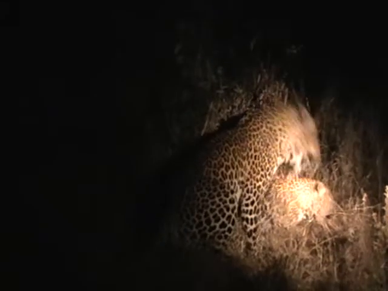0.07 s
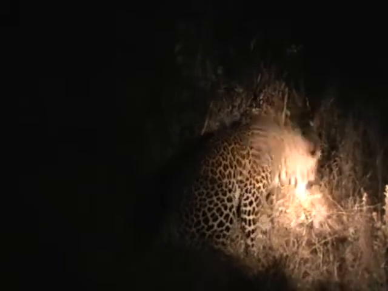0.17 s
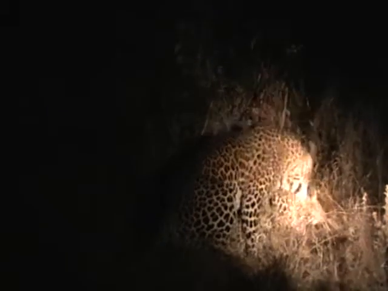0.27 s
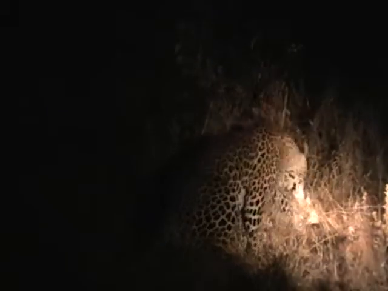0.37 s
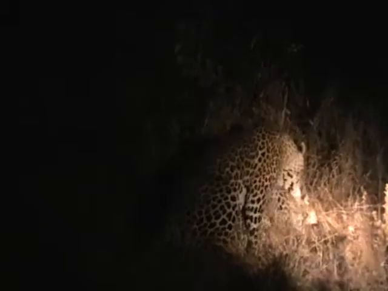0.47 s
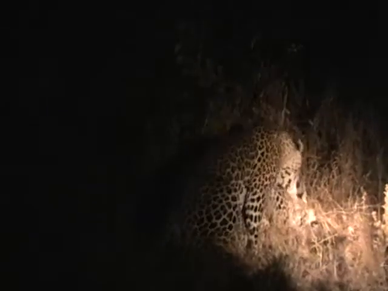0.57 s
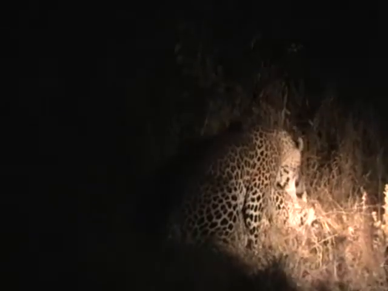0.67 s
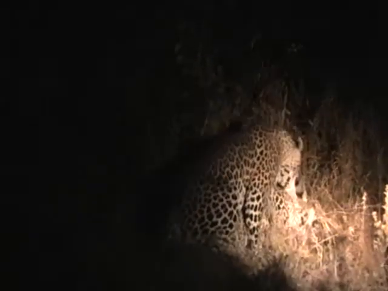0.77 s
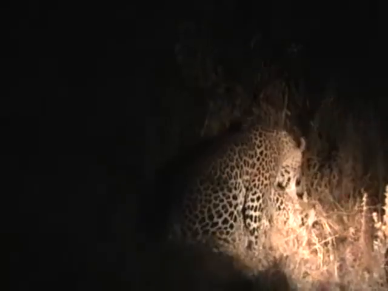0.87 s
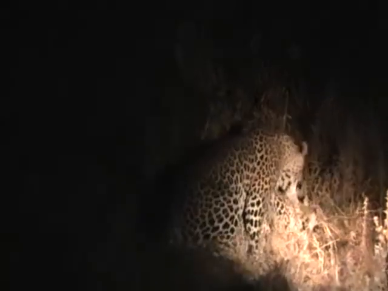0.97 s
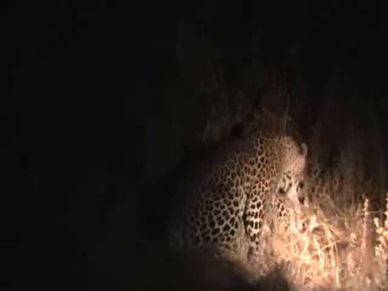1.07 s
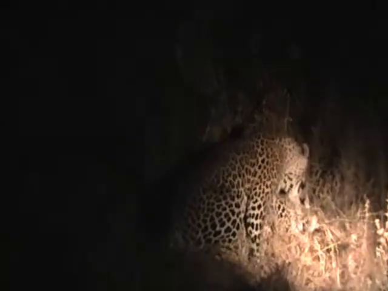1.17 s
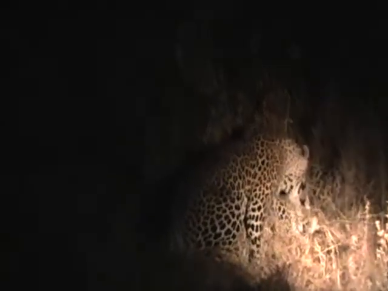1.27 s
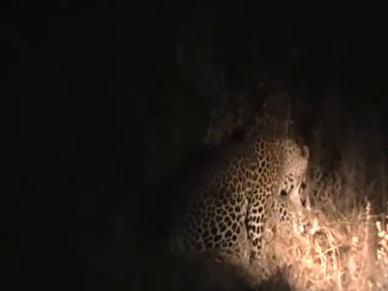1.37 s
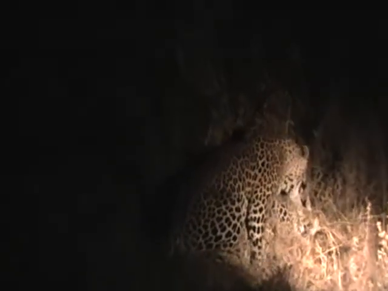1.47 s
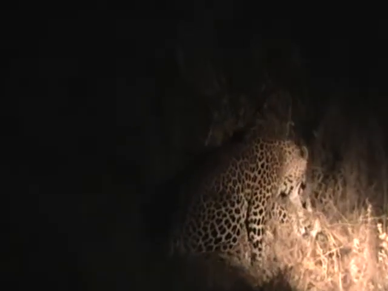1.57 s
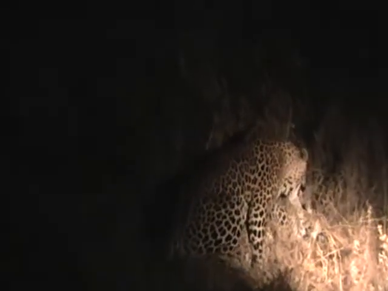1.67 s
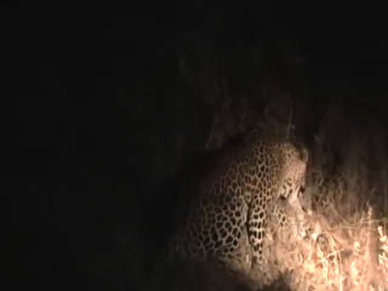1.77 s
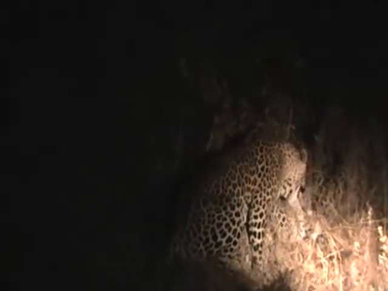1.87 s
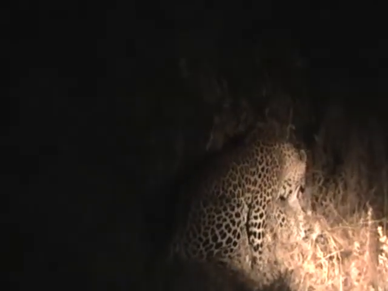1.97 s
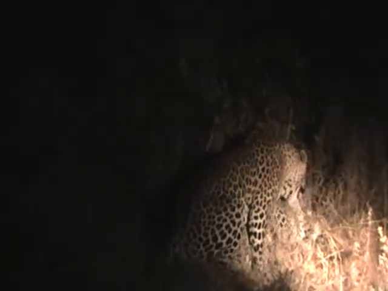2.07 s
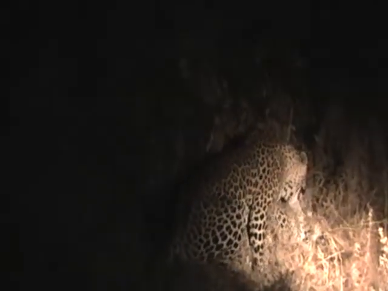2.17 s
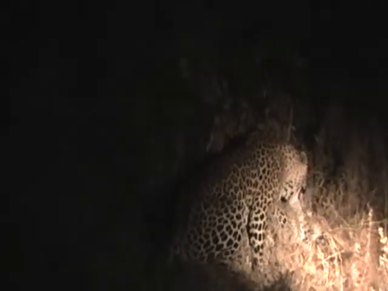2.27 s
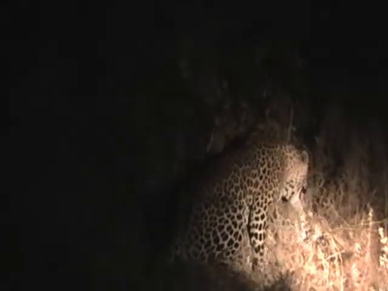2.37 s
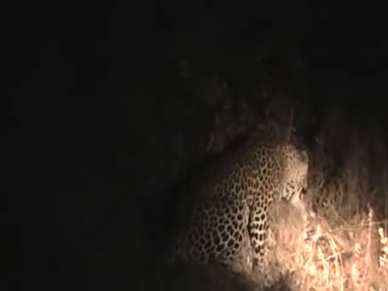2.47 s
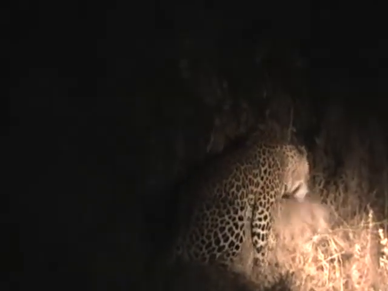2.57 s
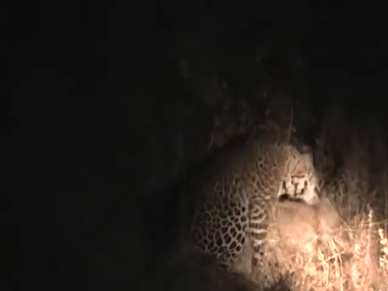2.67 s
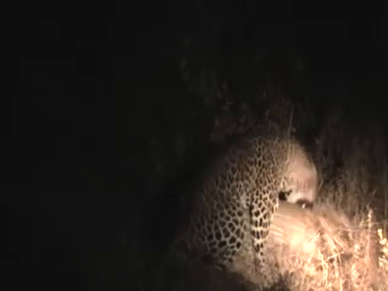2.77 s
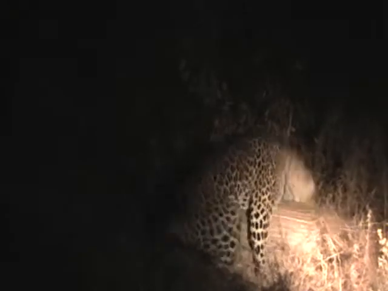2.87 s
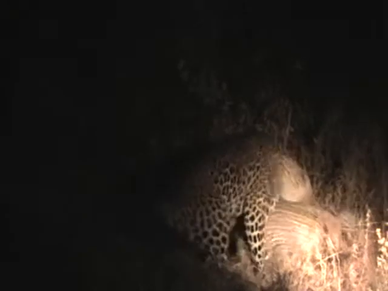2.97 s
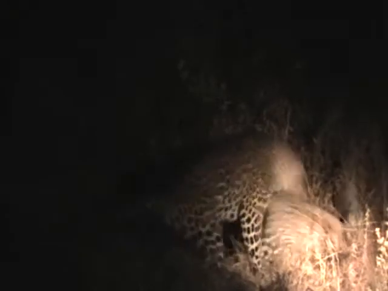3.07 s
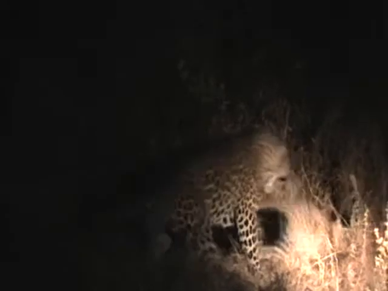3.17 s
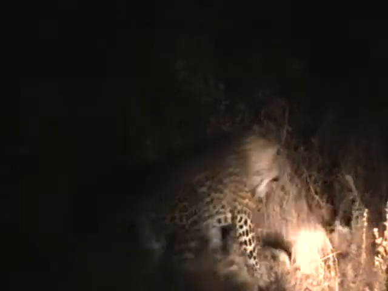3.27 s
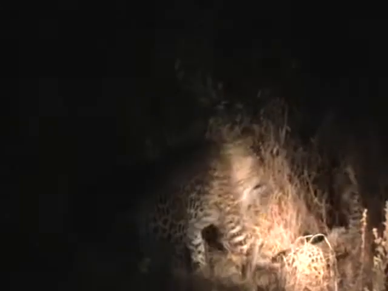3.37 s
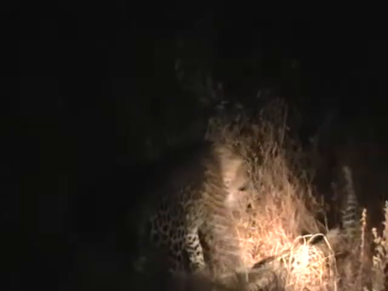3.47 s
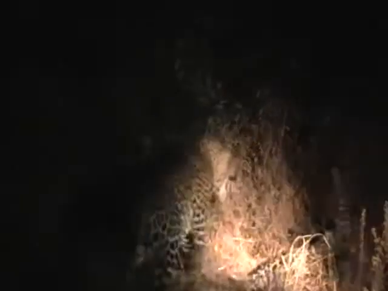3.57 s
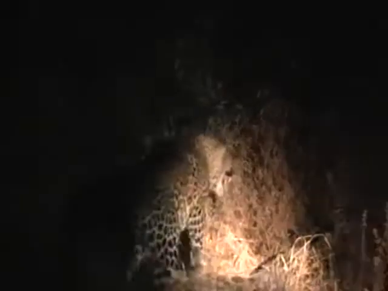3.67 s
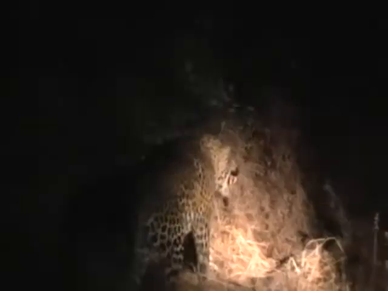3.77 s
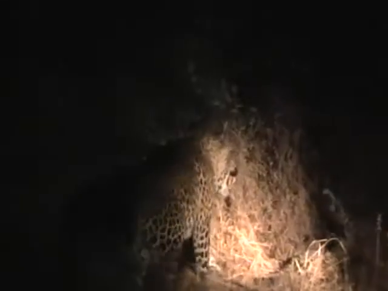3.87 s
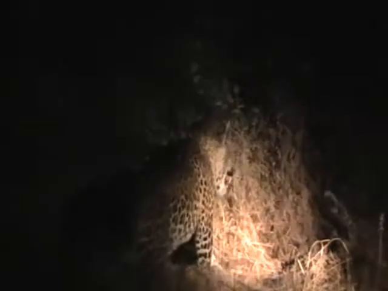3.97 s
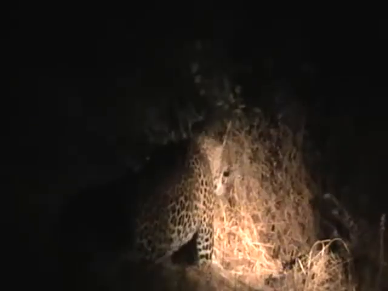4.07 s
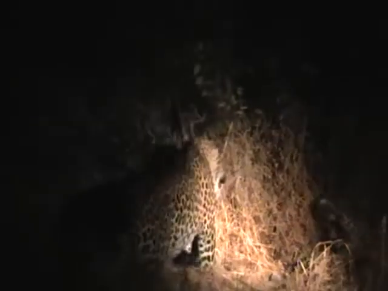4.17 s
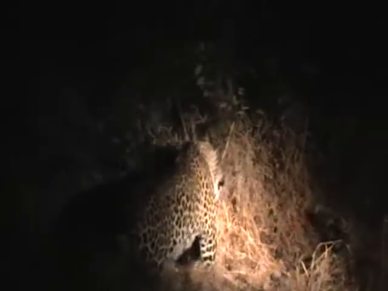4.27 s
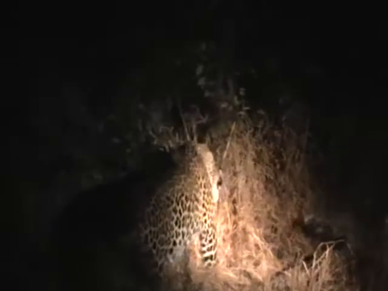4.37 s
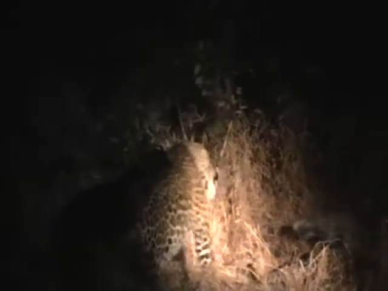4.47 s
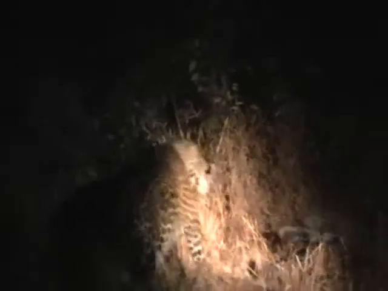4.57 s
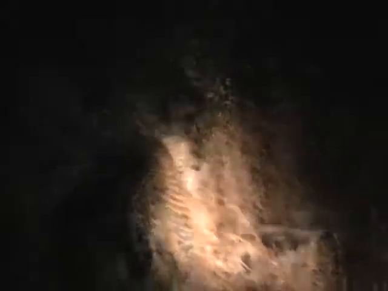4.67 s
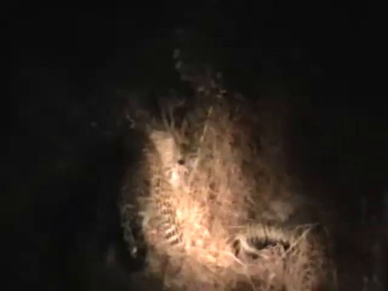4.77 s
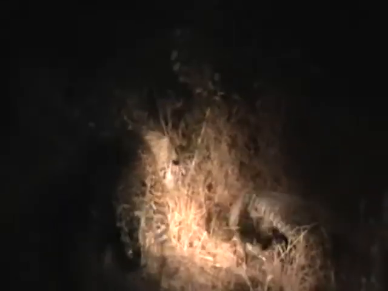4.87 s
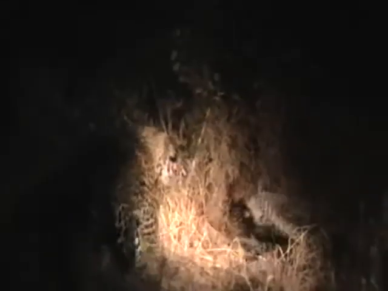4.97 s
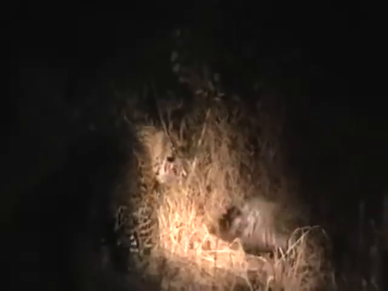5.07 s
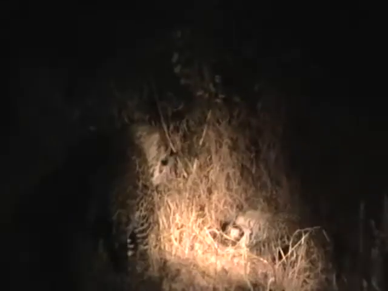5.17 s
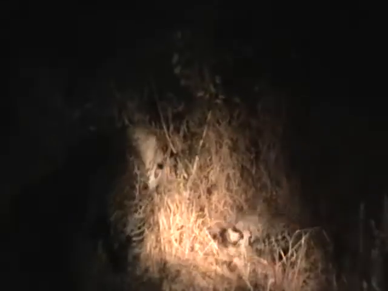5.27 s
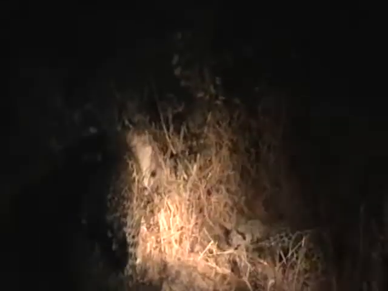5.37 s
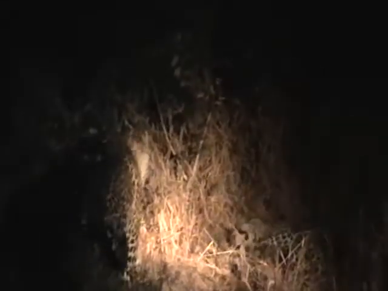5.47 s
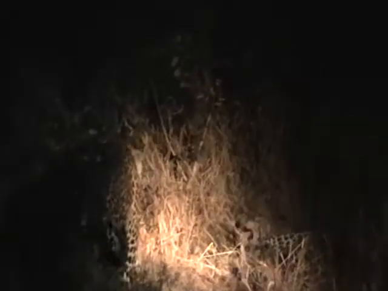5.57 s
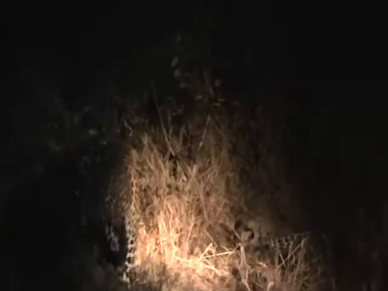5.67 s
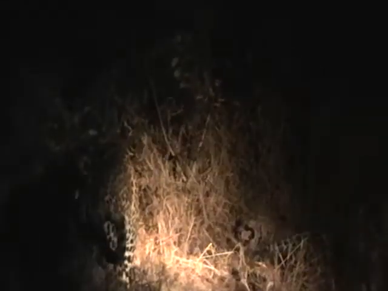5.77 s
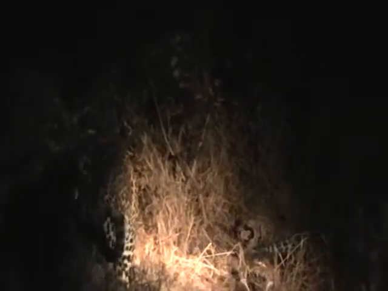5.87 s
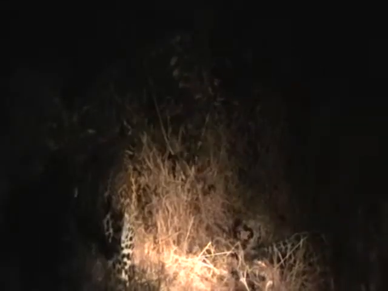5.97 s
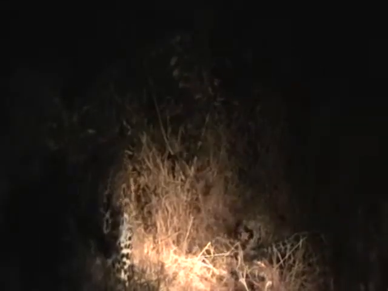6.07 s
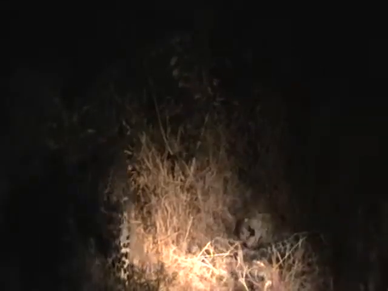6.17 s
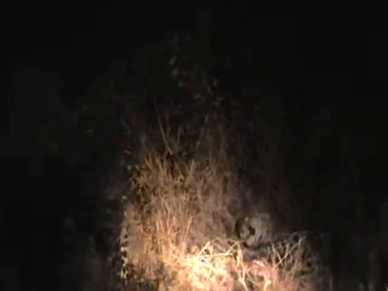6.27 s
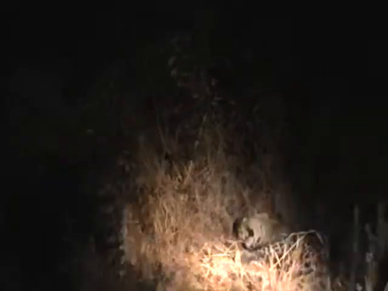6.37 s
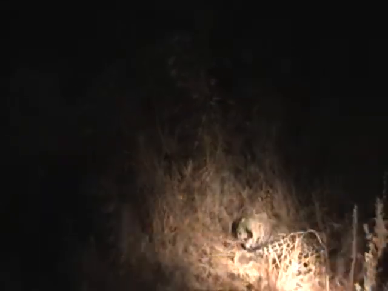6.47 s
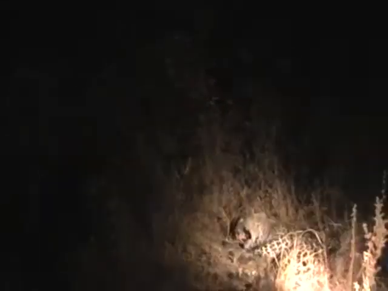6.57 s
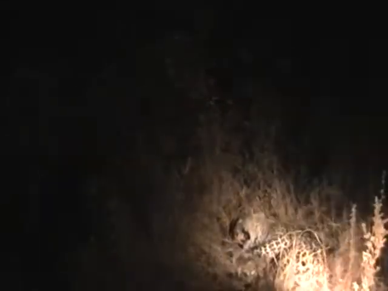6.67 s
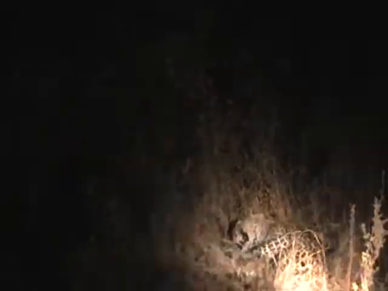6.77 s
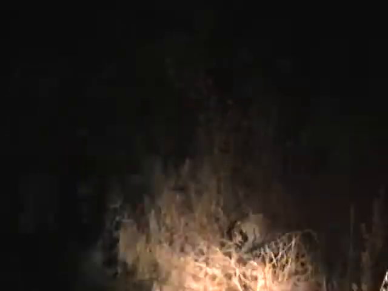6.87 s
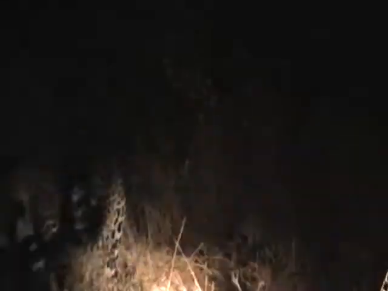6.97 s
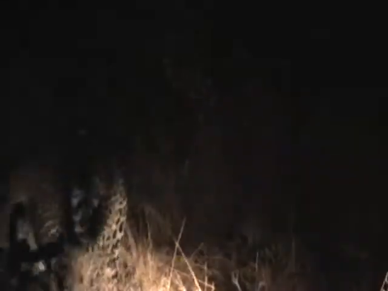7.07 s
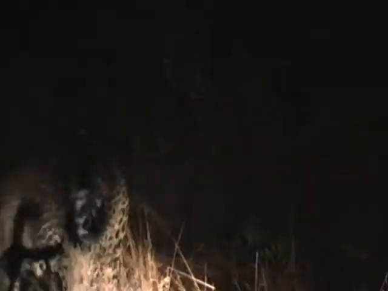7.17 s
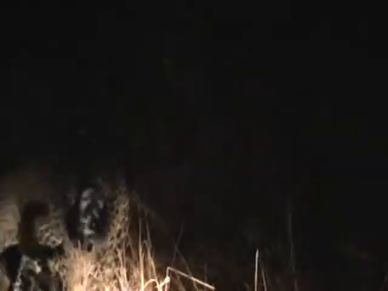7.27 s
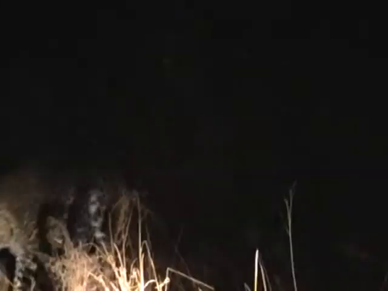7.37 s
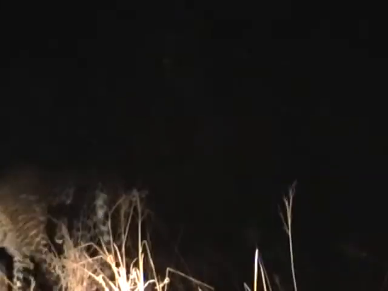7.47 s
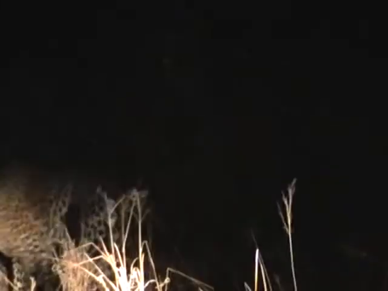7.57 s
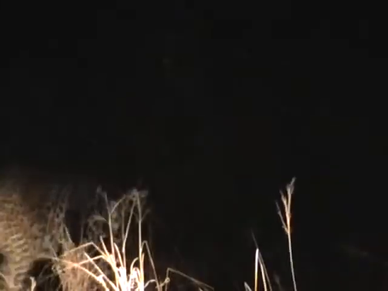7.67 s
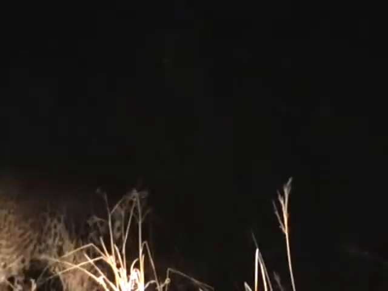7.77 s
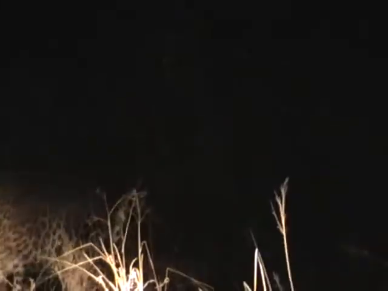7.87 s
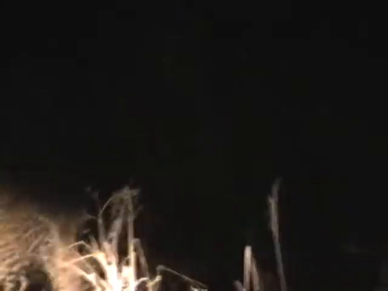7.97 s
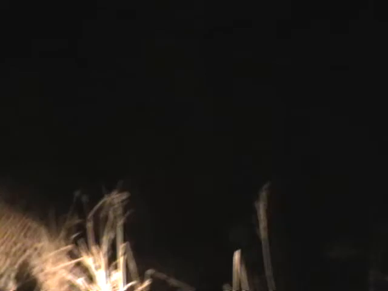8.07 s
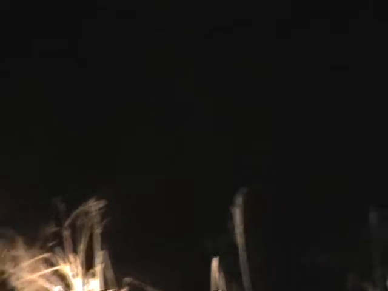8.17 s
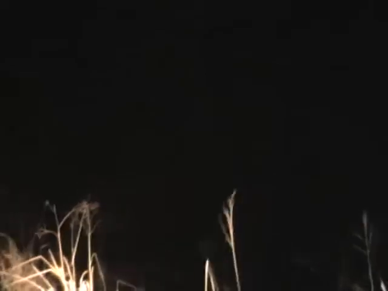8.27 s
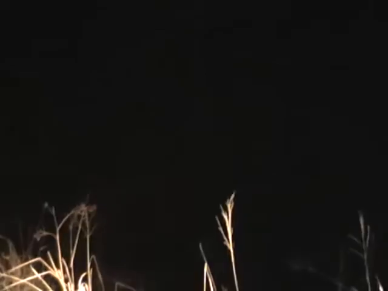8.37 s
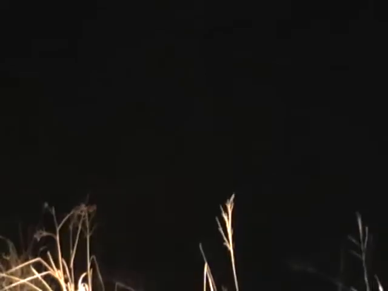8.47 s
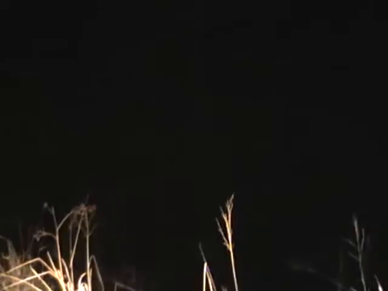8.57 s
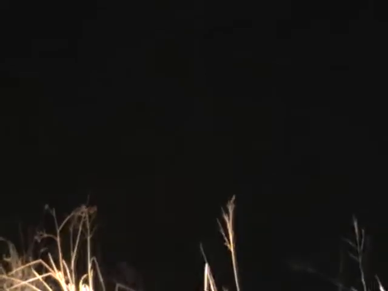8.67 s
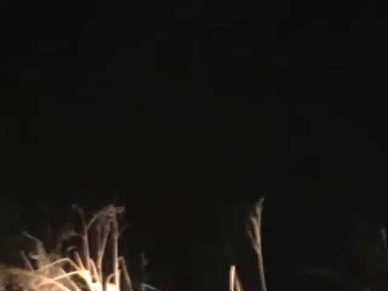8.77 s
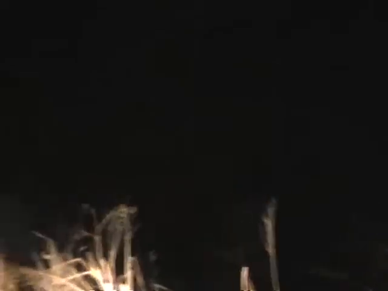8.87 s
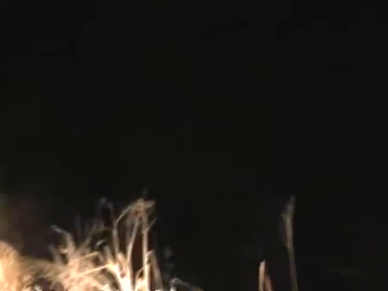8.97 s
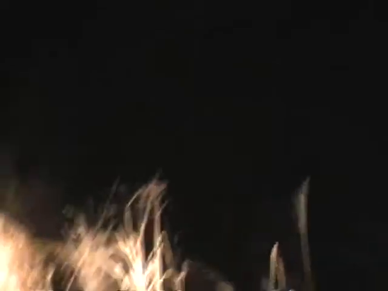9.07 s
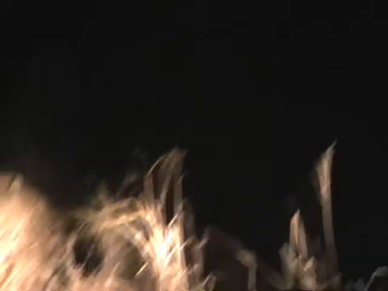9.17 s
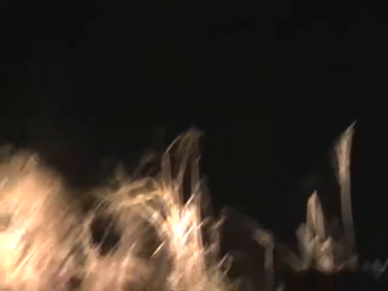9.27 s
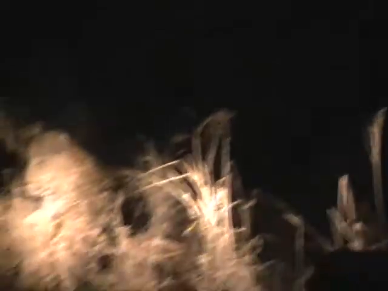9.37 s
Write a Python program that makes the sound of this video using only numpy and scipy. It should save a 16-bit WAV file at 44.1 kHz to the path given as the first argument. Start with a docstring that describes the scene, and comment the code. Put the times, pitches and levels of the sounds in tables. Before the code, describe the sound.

Two leopards are heard a few metres away in still night air with a faint low rumble. From the start one growls in slow, rough, pulsing breaths, beginning on the right and drifting towards the centre, with breathy hisses and brief spits. From about 0.2 to 3.3 seconds the other gives a hoarse, wavering moan and a run of short yelps, the strongest right at the beginning. Spits and a hiss come near 2.7 seconds. The growls stay strong while dry grass rustles from about 3 to 4.8 seconds, easing briefly around 4. At 5 seconds comes a louder spitting hiss with a strong growl, which drops away by 5.4. From 6 seconds to about 9.4 it is much quieter as the cats walk off: weak growls, soft low grunts, dull heavy paw thuds, light grass rustling and a few dry stalks snapping on the left.

```python
"""Two leopards mate and part in dry grass at night, a few metres from a stereo microphone, in quiet air.
One growls in slow throat pulses, starting on the right and drifting towards the centre, with breathy hisses
and spits through the teeth. For the first three seconds or so the other moans and yelps in hoarse bursts.
Then grass rustles as they roll, and a louder hiss comes at five seconds. After six seconds they walk off
through the grass with soft grunts, heavy paws and snapping stalks."""
import sys
import numpy as np
from scipy import signal
from scipy.io import wavfile
from scipy.ndimage import uniform_filter1d

SR = 44100
rng = np.random.default_rng(int(sys.argv[2]) if len(sys.argv) > 2 else 0)


def put_to_file(sound):
    """Save the sound as 16-bit audio at rate SR, in the file named by the first command-line argument."""
    columns = np.atleast_2d(sound).T  # one column per channel
    safe = np.clip(columns, -1, 1)
    whole_steps = np.round(safe * 32767)
    wavfile.write(sys.argv[1], SR, whole_steps.astype(np.int16))


N = 415863


def from_db(db):
    """Decibels to gain."""
    return 10 ** (np.asarray(db) / 20)


def rms_one(x):
    """Scales to rms 1."""
    return x / np.sqrt(np.mean(x ** 2) + 1e-20)


def evened(x):
    """Evens the level over a few pulses."""
    return x / np.sqrt(np.abs(uniform_filter1d(x ** 2, size=5000)) + 1e-6 * np.mean(x ** 2))


def in_time(rows):
    """Joins rows of (seconds, values..) into curves, one value a sample."""
    times, *columns = np.transpose(rows)
    return [np.interp(np.arange(N) / SR, times, column) for column in columns]


def drift(per_s):
    """Random points joined by straight lines; spread about 1."""
    return np.interp(np.arange(N) / SR * per_s, np.arange(200), rng.standard_normal(200))


def resonance(x, hz, *widths_hz):
    """Two-pole resonances in series, one for each width, with gain 1 at the peak."""
    for width_hz in widths_hz:
        r = np.exp(-np.pi * width_hz / SR)
        poles = [1, -2 * r * np.cos(2 * np.pi * hz / SR), r * r]
        x = signal.lfilter([(1 - r * r) / 2, 0, (r * r - 1) / 2], poles, x)
    return x


def band(x, low_hz, high_hz, order=2):
    """Butterworth band-pass."""
    return signal.sosfilt(signal.butter(order, [low_hz, high_hz], "band", fs=SR, output="sos"), x)


def placed(x, lean_db):
    """Mono to stereo; lean is left minus right."""
    return np.array([x * from_db(lean_db / 2), x * from_db(-lean_db / 2)])


def stereo_noise(spectrum, white, alike):
    """Half-octave bands of partly alike left and right noise; rms 1."""
    out, edges = 0, 30 * 2 ** np.arange(0, 9.6, .5)
    hz, level_db = np.transpose(spectrum)
    for k, (low, high) in enumerate(zip(edges, edges[1:])):
        mid, side = band(white[k % 2], low, high)
        gain = from_db(np.interp(np.log(low * high) / 2, np.log(hz), level_db))
        out = out + gain * (np.sqrt(1 + alike) * mid + np.sqrt(1 - alike) * side * [[1], [-1]])
    return rms_one(out)


def folds(per_s, uneven, breath, puff_s, soft_hz=6000):
    """Vocal folds click at each closing, uneven in time and size; a puff of breath noise follows."""
    count = len(per_s)
    wobble = np.repeat(rng.standard_normal(count // 400 + 1), 400)[:count]
    turns = np.cumsum(per_s * np.exp(1.5 * uneven ** 2 * wobble)) / SR + rng.random()
    breath = np.clip(breath + np.zeros(count), 0, 1)
    closings = np.diff(np.floor(turns), prepend=0) > 0
    clicks = closings * from_db((5 * uneven + 3 * breath) * rng.uniform(-1, 1, breath.shape))
    leak = .6 * breath ** 2 * np.tanh(5 * uneven)   # folds that no longer close leak steadily
    puffs = signal.lfilter([1], [1, -np.exp(-1 / (puff_s * SR))], clicks) + leak
    air = rms_one(puffs * rng.standard_normal(count))
    flaps = signal.sosfilt(signal.butter(2, soft_hz, fs=SR, output="sos"), clicks + 1e-18)
    return np.sqrt(1 - breath) * flaps / np.sqrt(np.mean(clicks ** 2) + 1e-20) + np.sqrt(breath) * air


def night_air():
    """Still night air all around, mostly a low rumble."""
    # The air's spectrum. Each row: frequency in Hz, relative level in dB.
    spectrum = [(25, 0.5), (60, 5), (125, 6), (499, -10), (1010, -13.5), (2120, -8), (7270, -42),
                (16000, -47)]
    return from_db(-56.5) * stereo_noise(spectrum, rng.standard_normal((2, 2, N)), alike=.7)


def breaths():
    """Each growled breath swells, holds and lets go; the folds slow as the air runs out."""
    # Each row: full voice at in seconds, hold in seconds, chest, throat and mouth levels in dB,
    # fade in dB a second (negative grows), opening pulses a second, roughness from 0 to 1.
    growls = [(0, 0.1, -54, -46, -32, 111, 44, 0.48), (0.132, 0.58, -41, -40.5, -49, -5, 41, 0.41),
              (.6, 0.49, -34, -31, -41, 3, 43, .22), (1.22, 0.31, -39.5, -32.5, -44.5, 10, 49, 0.54),
              (1.701, 0.66, -30, -31.5, -42.5, 27, 44, .22), (2.31, 0.25, -37.5, -30, -44, 17, 57.4, 0.38),
              (2.7, 0.32, -34, -31, -32, -20, 51, 0.42), (3.07, .14, -34, -29, -29.5, -2, 50.7, 0.16),
              (3.24, 0.21, -30.5, -31, -29, -14.5, 52, 0.43), (3.471, 0.32, -34, -27, -30, 39, 40.4, 0.18),
              (3.84, 0.33, -51.5, -51.5, -49, 9, 39.3, 0.44), (4.23, 0.16, -41, -42, -43.5, 5, 54, 0.56),
              (4.418, 0.27, -35, -37.5, -34.5, -12, 62, 0.4), (4.73, 0.1, -42.5, -46, -42, -3, 65.4, 0.59),
              (4.94, 0.091, -31, -26, -26, -66, 60.4, .24), (5.06, 0.31, -31, -27.5, -27.5, 89, 44, 0.26),
              (5.37, 0.51, -56, -54.5, -52, 6, 31.5, 0.32), (6.249, .15, -48.5, -60, -53.5, 47, 40, .6),
              (6.45, 0.1, -52, -61.5, -55.5, -66, 36.4, 0.67), (6.72, .26, -63, -59.5, -63.5, 11, 47, 0.86),
              (7.029, 0.35, -53.5, -45.5, -52, -9, 47, 0.12), (7.528, 0.027, -60, -47, -51, 150.5, 38, 0.9),
              (7.575, 0.071, -63, -47, -45.5, 199, 39, 0.8),
              (8.281, 0.29, -56, -61.5, -61.5, -15, 32, 0.88), (8.87, 0.15, -54, -64, -48.5, 12, 80, .7)]
    # Chest, throat and mouth: level between breaths in dB, then the share of the fade each takes.
    rest_db = (-97, -103, -94)
    fade_shares = (0.77, 0.97, 0.93)
    attack_db_per_s, release_db_per_s, sag_s = 449.5, 480, 1.0
    t = np.arange(0, N, 16) / SR
    effort_db = np.transpose([rest_db]) + np.zeros_like(t)
    per_s, rough, lead_db = np.zeros_like(t), np.zeros_like(t), np.full_like(t, -np.inf)
    for s, held_s, *levels_db, fade, pulses, roughness in growls:
        into_s = np.clip(t - s, 0, held_s)
        edge_db = -attack_db_per_s * np.maximum(s - t, 0)
        edge_db -= release_db_per_s * np.maximum(t - s - held_s, 0)
        held_db = np.transpose([levels_db]) - fade * np.outer(fade_shares, into_s)
        effort_db = np.maximum(effort_db, held_db + edge_db)
        leads = edge_db > lead_db   # the breath nearest full voice drives the folds
        per_s[leads] = pulses * np.exp(-(into_s[leads] / sag_s) ** 2)
        rough[leads] = roughness
        lead_db = np.maximum(lead_db, edge_db)
    return [np.repeat(control, 16, axis=-1)[..., :N] for control in (effort_db, per_s, rough)]


def growl():
    """Slow fold pulses ring the throat; chest, throat and mouth ranges each follow their own effort."""
    # Throat shapes. Each row: start in seconds, resonances as (Hz, base width in Hz, relative dB).
    throats = [(0, [(172, 54, 5.5), (408, 15, -1.5), (576, 29, -12), (860, 190, -6.5), (1560, 180, -2.5),
               (2350, 870, -2.5), (3920, 630, -16), (6300, 630, -13.5)]), (2.632, [(222, 94, 18),
               (363, 72, 23.5), (850, 126, 6), (1090, 126, 1), (1660, 110, 5), (2740, 450, -3.5)]),
               (3.24, [(231, 54, 7), (377.4, 43.4, 19), (895, 185, 6.5), (1344, 85.5, 1),
               (1604, 60.5, -0.5), (1828, 110.6, -5), (2550, 420, -10.5)]), (4.148, [(373.3, 84, 21),
               (922.7, 110, 20.5), (1580, 111, 7), (2229, 470, 5), (7140, 800, -6.5)]),
               (4.7, [(370.6, 72.7, 14), (1540, 212, 6.5), (2301, 350, 7.5)]), (4.879, [(176.5, 88, 5.5),
               (578.2, 45, 7.5), (980, 110, -1.5), (1577, 75, 3.5), (2200, 346, -1), (4010, 139, -7)]),
               (5.084, [(146, 102, 9), (340, 31.7, 3), (1054, 140, -2.5), (1317, 51, 2.5),
               (2250, 420, -8.5), (3630, 390, -9.5)]), (6.001, [(283, 130, -3), (800, 127, 2),
               (1910, 480, -6.5)]), (6.903, [(568, 29, 11.5), (969, 180, -3), (2350, 545, -5.5)]),
               (7.46, [(294.4, 148, -7), (2150, 470, -15)])]
    # The lows move from the right towards the centre. Each row: time in seconds, lean in dB.
    lean_path = [(0, -16.5), (1.2, -9), (2.6, -4), (9.43, -1.5)]
    # Chest, throat and mouth: share of breath noise with smooth folds, then the extra at full roughness.
    smooth_breath = (.05, .25, .22)
    rough_breath = (.6, 1.3, 1.9)
    efforts_db, per_s, rough = breaths()
    lean_db, = in_time(lean_path)
    breath = np.transpose([smooth_breath]) + np.outer(rough_breath, rough)
    source = folds(per_s, rough, breath, puff_s=.009, soft_hz=2500)
    ranges_hz = [(68.5, 165.3), (283.5, 813), (663, 20000)]
    leans_db = [lean_db, 0.57 * lean_db, 0.5 * lean_db + 4.0]
    voiced = np.zeros_like(source)
    starts = [round(s * SR) for s, _ in throats] + [N]
    for start, end, (_, modes) in zip(starts, starts[1:], throats):
        early = min(start, SR // 20)
        flaps = source[:, start - early:end + SR // 20]
        ringing, count = 0, flaps.shape[1]
        for hz, width_hz, level_db in modes:
            # Wet folds excite each resonance differently from flap to flap, the high ones most.
            chance = np.repeat(rng.standard_normal(count // 900 + 1), 900)[:count]
            blend = from_db(1.5 * min(hz / 1000, 3) * chance)
            ringing += from_db(level_db) * resonance(flaps * blend, hz, 4.54 * width_hz, 0.94 * width_hz)
        for part, ring, edges_hz in zip(voiced, ringing, ranges_hz):
            part[start:end] = evened(band(ring, *edges_hz, order=3))[early:early + end - start]
    # Head and jaw never hold still: every resonance slides a few per cent.
    sway = np.arange(N) + .0015 * SR * uniform_filter1d(drift(10), size=2000)
    return sum(placed(from_db(effort_db) * np.interp(sway, np.arange(N), part), lean)
               for lean, effort_db, part in zip(leans_db, efforts_db, voiced))


def hisses_and_grass():
    """Crackly noise: the cats' breathy hisses during the growls, dry grass as they roll and walk off."""
    # Breath hisses (up to 2.72 s, and at 5.0 and 5.2 s) and grass rustles (the rest).
    # Each row: peak time in seconds, level in dB, rise and fall in seconds per 20 dB.
    swells = [(.07, -45, 0.39, 0.14), (.5, -48, 0.88, 0.064), (0.998, -49.5, 1.9, 0.17),
              (1.3, -51.5, 0.36, 3.6), (2.72, -40, 0.16, 2.5), (3.3, -37, 0.41, 0.36),
              (3.62, -37, 0.48, 0.26), (4.04, -38.5, .25, 0.19), (4.8, -43, 2.51, 0.36),
              (5.0, -29.5, 0.15, 0.23), (5.2, -45, .2, 1.26), (6.03, -47.5, 0.21, 0.26),
              (6.13, -46, 0.15, 0.19), (6.36, -51, 0.43, 0.26), (7.97, -52.5, 0.41, 1.1),
              (8.45, -50.5, 1.06, 0.5), (8.901, -46.5, 0.56, 0.38)]
    # The bright spectrum both share. Each row: frequency in Hz, relative level in dB.
    colour = [(1800, -5), (3000, -5.5), (7000, 1), (10000, -3), (15000, -10.5)]
    t, level_db = np.arange(N) / SR, np.full(N, -58.5)   # a faint hiss stays between swells
    for s, peak_db, rise_s, fall_s in swells:
        level_db = np.maximum(level_db, peak_db - 20 * np.maximum((s - t) / rise_s, (t - s) / fall_s))
    crackles = (rng.random(N) < 300 / SR) * from_db(6.0 * np.minimum(rng.exponential(1, N), 5))
    crackle_tails = rms_one(signal.lfilter([1], [1, -.985], crackles))
    hiss = rng.standard_normal((2, 2, N)) * (1 + .5 * crackle_tails)
    clumps_db = 2.8 * drift(20)
    return from_db(level_db + clumps_db) * stereo_noise(colour, hiss, alike=0.77) * from_db([[1.3], [-1.3]])


def spits():
    """Short puffs of air ring the gaps between bared teeth, each in its own blend."""
    # Spits. Each row: start in seconds, relative level in dB.
    puffs = [(0.019, -24), (0.055, -13.5), (0.384, -25.5), (0.4914, -26), (2.7214, -14), (2.7429, -16.5),
             (2.812, -12), (4.994, -10.5), (5.028, -15.5)]
    # Tooth gap resonances. Each row: frequency in Hz, base width in Hz, relative level in dB.
    teeth = [(2340, 1750, 1), (4020, 670, 2), (5160, 780, 4.5), (6750, 1220, 0)]
    rise_s, fall_s = 0.0018, 0.0065
    out, t = np.zeros(N), np.arange(SR // 16) / SR
    envelope = (1 - np.exp(-t / rise_s)) * np.exp(-t / fall_s)
    for (s, puff_db), blend_db in zip(puffs, rng.normal(0, 6.6, (len(puffs), len(teeth)))):
        air = rng.standard_normal(len(t))
        hiss = sum(from_db(level_db + more_db) * resonance(air, hz, 2 * width, width)
                   for (hz, width, level_db), more_db in zip(teeth, blend_db))
        at = round(s * SR)
        out[at:at + len(t)] += from_db(puff_db) * envelope * rms_one(hiss)
    return placed(from_db(-6.5) * out, lean_db=3.5)


def moan():
    """Hoarse voicing through one narrow throat resonance that glides as the jaw moves."""
    # The moan's course. Each row: time in seconds, throat resonance in Hz, level in dB.
    glide = [(.2, 390, -59), (.25, 370, -17), (.31, 312, -34), (.45, 288, -26.5), (.65, 412, -31.5),
             (1.1, 435, -36), (1.2, 549.4, -28.5), (1.28, 400, -31), (1.48, 529, -35.5), (1.7, 562, -38),
             (2.15, 553, -36.5), (2.3, 420, -35), (2.55, 408.4, -36.5), (2.63, 369.8, -60),
             (2.9, 321, -30.5), (3.03, 235, -22), (3.12, 202.6, -37.5)]
    pitch_hz, width_hz = 187.1, 75
    throat_hz, level_db = in_time(glide)
    source = folds(np.full(N, pitch_hz), uneven=0.27, breath=0.98, puff_s=0.0021)
    r = np.exp(-np.pi * width_hz / SR)
    out, state = np.zeros(N), np.zeros((2, 2))
    for i in range(round(glide[0][0] * SR), round(glide[-1][0] * SR), 128):
        stage = [1, 0, -1, 1, -2 * r * np.cos(2 * np.pi * throat_hz[i] / SR), r * r]
        out[i:i + 128], state = signal.sosfilt([stage, stage], source[i:i + 128], zi=state)
    return placed(from_db(level_db) * evened(out), lean_db=-6.0)


def yelps():
    """Fast hoarse pulses through a wide open mouth, with a faint whistle at the teeth."""
    # Yelps. Each row: time in seconds, level in dB, mouth resonance in Hz, rise in seconds,
    # seconds to fall 60 dB, glide as the jaw opens in octaves a second (an octave at most).
    cries = [(0.236, -8.5, 998, 0.00054, 0.025, 0.5), (0.254, -18.5, 1210, 0.0036, 0.064, -1.5),
             (0.276, -12, 1447, 0.001, 0.022, -7), (0.443, -28, 1320, 0.004, 0.16, 0.5),
             (0.487, -24, 1270, 0.0028, 0.051, 1), (0.549, -31, 1370, 0.0064, 0.11, -2.5),
             (0.626, -28, 1380, 0.0052, 0.098, 0.5), (0.727, -20, 1034, 0.0036, 0.079, 2),
             (0.919, -19, 894.4, 0.0043, 0.062, 4.5), (1.159, -18.5, 1008, 0.0051, 0.099, 4.5),
             (1.189, -15.5, 923, 0.013, 0.076, 3), (1.246, -19, 953, 0.005, 0.13, 2.5),
             (1.398, -26, 1008, 0.0041, 0.13, 6.5), (1.417, -22.5, 920, 0.0025, 0.1, 2.5),
             (1.479, -15.5, 1026, 0.0025, 0.087, 0.5), (1.592, -26.5, 955, 0.011, 0.14, -2.5),
             (1.713, -16.5, 1010, 0.0033, 0.058, 3), (1.955, -24, 985, 0.0038, 0.078, 0.5),
             (2.034, -12, 1129, 0.0082, 0.071, 0.5), (2.288, -14.5, 1143, 0.014, 0.085, -2),
             (2.431, -19, 927, 0.012, 0.082, 1.5), (2.683, -25.5, 859.4, 0.0066, 0.066, 1),
             (2.895, -18.5, 800, 0.0081, 0.12, 38), (3.267, -21.5, 817, .004, 0.058, 0.5)]
    # Mouth modes. Each row: ratio to the mouth resonance, base width in Hz, relative level in dB.
    mouth = [(1.002, 181, 4.5), (1.295, 74, -3), (1.54, 203, -5.5), (.7, 310, -13)]
    out, t = np.zeros(N), np.arange(SR // 5) / SR
    for s, cry_db, mouth_hz, rise_s, length_s, opening in cries:
        pitch_hz = mouth_hz / round(mouth_hz / 245)   # puts an overtone on the mouth resonance
        source = folds(np.full(2 * len(t), pitch_hz), uneven=.16, breath=.25, puff_s=.002)
        cry = sum((-1) ** k * from_db(level_db) * resonance(source, ratio * mouth_hz, 2 * width, width)
                  for k, (ratio, width, level_db) in enumerate(mouth))
        speed = 2 ** np.clip(opening * t, -1, 1)
        cry = np.interp(np.cumsum(speed), np.arange(len(cry)), cry)
        whistle = from_db(rng.normal(-26, 3.0)) * resonance(source[:len(t)], 6200, 1100, 1100)
        envelope = (1 - np.exp(-(t / rise_s) ** 2)) * from_db(-60 * (t / length_s) ** 2)
        at = round((s - .004) * SR)
        out[at:at + len(t)] += from_db(cry_db) * envelope * rms_one(cry + whistle)
    return placed(out, lean_db=0.5)


def knocks(events, cycles, gain_db):
    """Each event rings for a few cycles at its own pitch, with a little noise in it."""
    out, t = np.zeros(N + SR), np.arange(SR // 8) / SR
    for s, peak_db, hz in events:
        push = (t == 0) + 0.098 * rng.standard_normal(len(t)) * np.exp(-t * hz / cycles)
        ring = resonance(push, hz, 1.27 * hz, hz / cycles)
        at = round(s * SR)
        out[at:at + len(t)] += from_db(peak_db + gain_db) * ring / np.abs(ring).max()
    return out[:N]


def grunts():
    """Low grunts and heavy paws thud as the cats walk off, a little to the right."""
    # Thuds. Each row: start in seconds, relative peak in dB, pitch in Hz.
    thuds = [(6.222, -42, 291), (6.267, -36, 118.7), (6.352, -41, 147.6), (7.238, -37, 124.4),
             (7.268, -32, 142.4), (7.309, -34.5, 133.3), (7.351, -31.5, 142.9), (7.527, -37, 124),
             (8.246, -34.5, 135), (8.488, -31.5, 253), (8.694, -34.5, 127.8), (8.729, -38.5, 105),
             (9.293, -40.5, 137), (9.364, -42, 136)]
    return placed(knocks(thuds, cycles=2.9, gain_db=1.0), lean_db=-3.5)


def snaps():
    """Dry stalks break and ring briefly, off to the left."""
    # Breaking stalks. Each row: start in seconds, relative peak in dB, pitch in Hz.
    stalks = [(6.2985, -44, 1704), (6.702, -47, 810), (6.706, -42, 1920), (7.5283, -36.5, 2050),
              (7.5774, -37.5, 2280), (8.6767, -46, 1710)]
    return placed(knocks(stalks, cycles=13.5, gain_db=5.7), lean_db=9.4)


def scene():
    """Both cats, the grass and the night; the ground returns one dull echo to each side."""
    cats = growl() + moan() + yelps() + spits() + grunts() + snaps()
    echo = np.array([np.roll(cats[0], 190), np.roll(cats[1], 310)])
    return cats + from_db(-7.0) * band(echo, 1310, 6000) + night_air() + hisses_and_grass()


def record(dry):
    """The microphone drops the deep bass; the top is cut steeply."""
    thinned = signal.sosfilt(signal.butter(3, 55, "high", fs=SR, output="sos"), dry)
    return signal.sosfilt(signal.cheby2(20, 70, 16100, fs=SR, output="sos"), thinned)


dry = scene()
out = record(dry)
put_to_file(out)
```